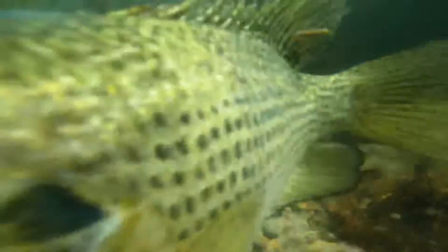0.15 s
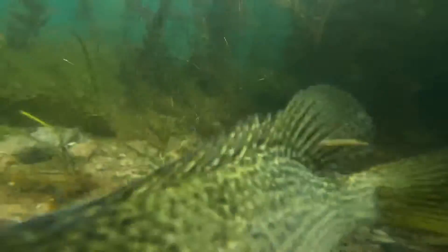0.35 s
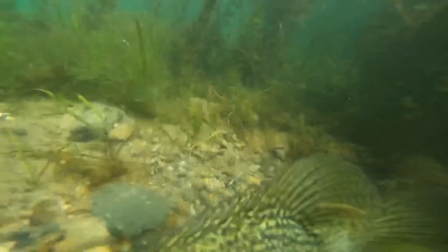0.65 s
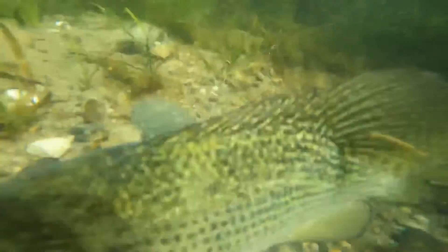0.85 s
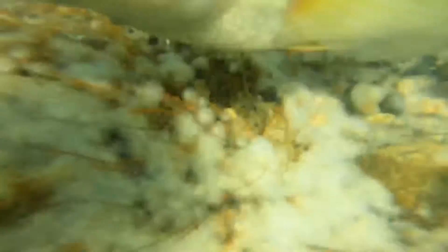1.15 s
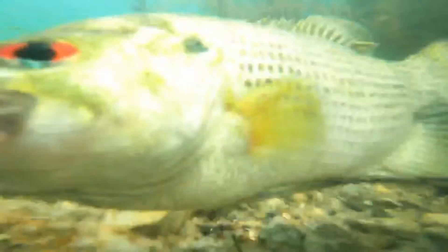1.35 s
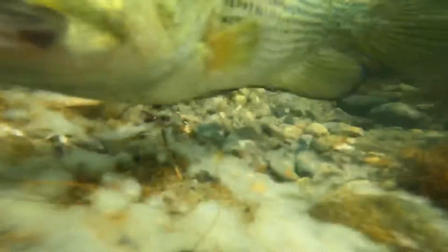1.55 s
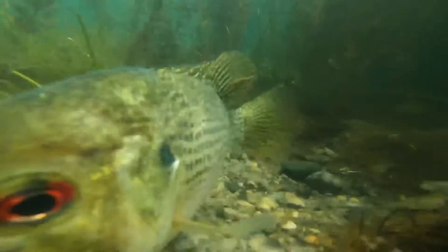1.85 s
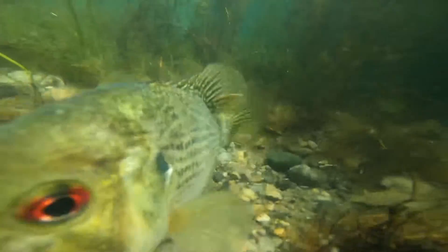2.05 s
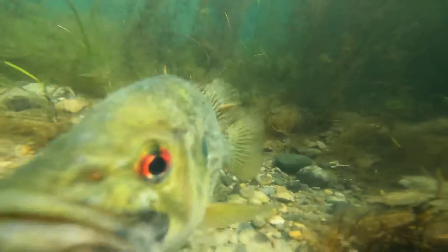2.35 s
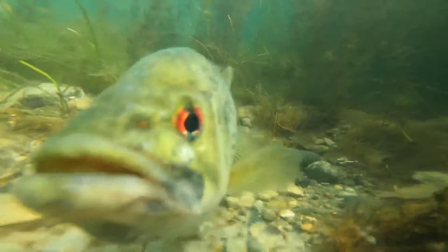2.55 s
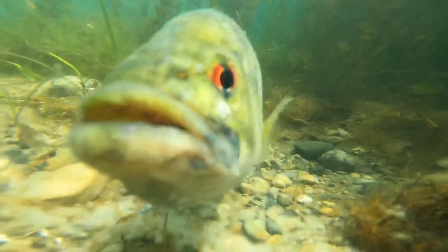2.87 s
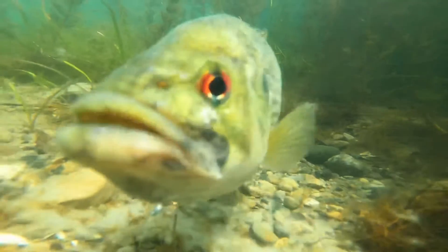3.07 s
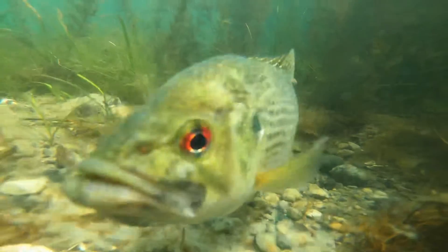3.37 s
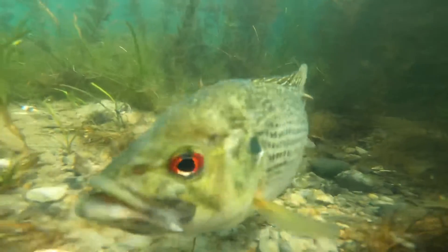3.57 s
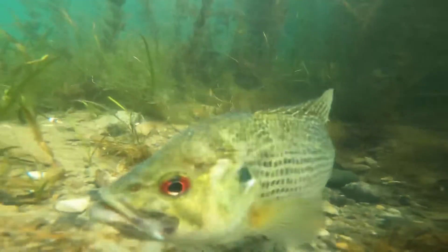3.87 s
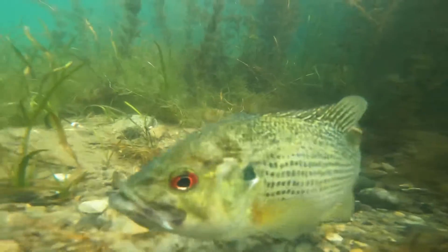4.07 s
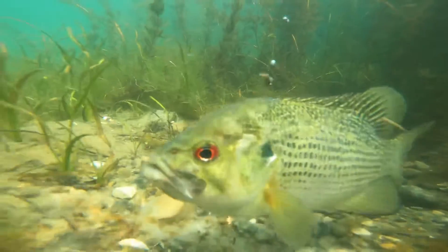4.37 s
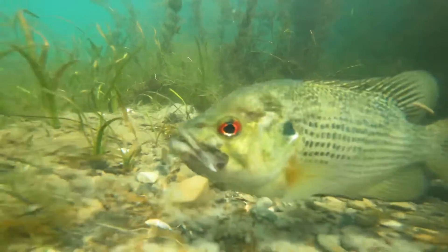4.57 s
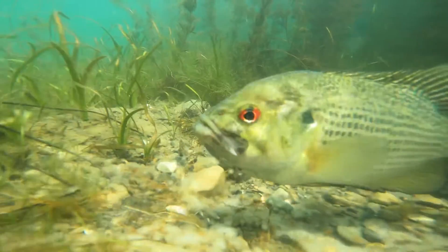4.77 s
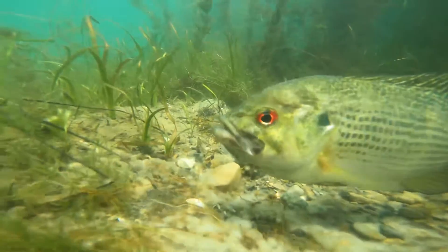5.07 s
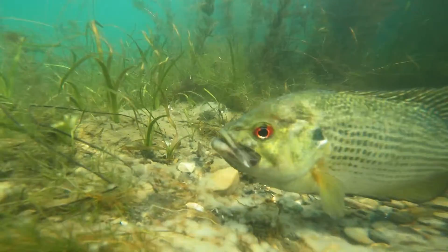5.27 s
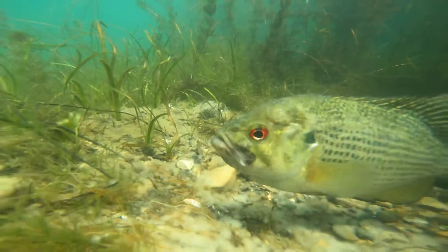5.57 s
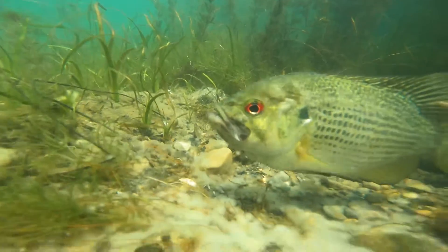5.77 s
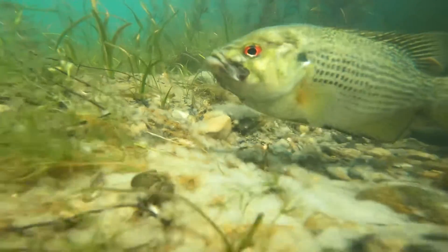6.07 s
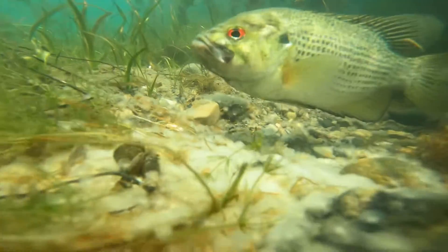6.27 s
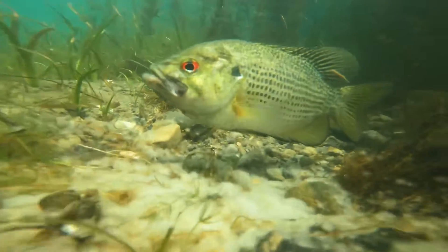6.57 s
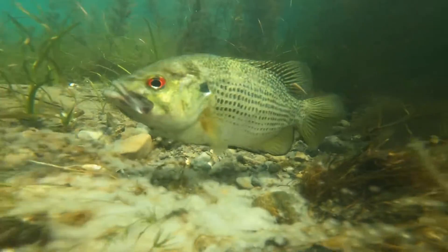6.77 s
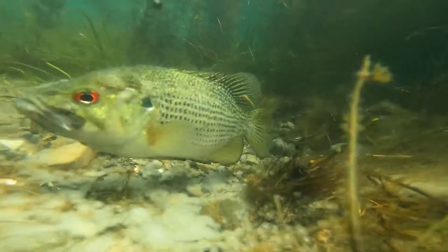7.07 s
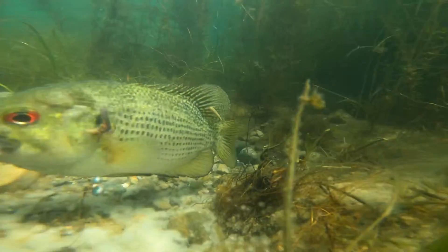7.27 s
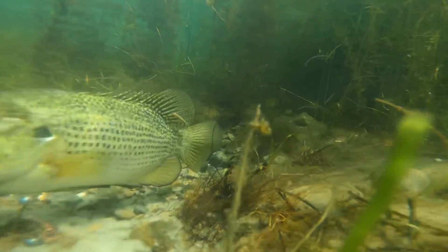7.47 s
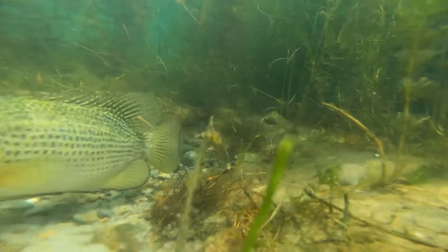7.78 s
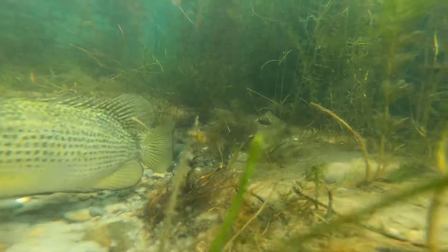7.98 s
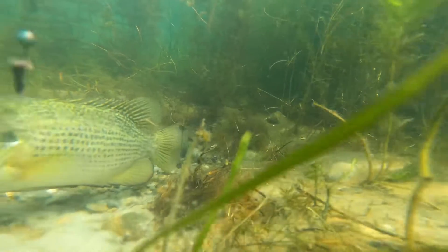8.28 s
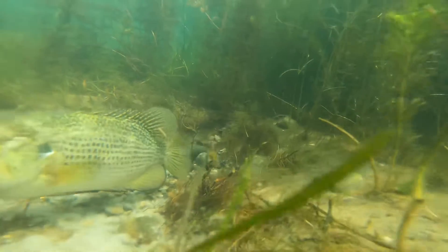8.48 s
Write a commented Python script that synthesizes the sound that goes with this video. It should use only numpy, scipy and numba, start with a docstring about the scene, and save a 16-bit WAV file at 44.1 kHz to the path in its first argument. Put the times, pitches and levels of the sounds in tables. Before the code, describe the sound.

Dry, boxy plastic knocks hit very close to the microphone, with dull low thumps, short rubbing strokes and small gurgling or creaking tones at first. The busy contact fades after two seconds. Muffled underwater quiet remains: thin hiss, faint steady ticking and a weak high whine, soft taps near three and a half seconds, then scraping and a heavy double clunk at six, and almost nothing after.

```python
"""Underwater camera on gravel

A small sealed camera on a stick is moved over a gravel lake bed while a fish brushes past it.
Noise bursts (knocks) and dense random slips (rubbing, and a knock's tail at the start) ring the housing's
modes; after an opening click, water heaves as band-passed low-frequency pushes; shoves and blips are short
sines. Coloured noise hisses, electronics tick and whine; loud contact makes the gain control pull these down."""
import sys
import numpy as np
from scipy import signal
from scipy.fft import rfft, irfft
from scipy.io import wavfile
from scipy.ndimage import uniform_filter1d, minimum_filter1d
from numba import njit

SR = 44100
rng = np.random.default_rng(int(sys.argv[2]) if len(sys.argv) > 2 else 0)


def transcribe(signal):
    """Save signal, clipped to [-1, 1], as a 16-bit WAV file at the path in sys.argv[1]."""
    frames = np.atleast_2d(signal).T
    limited = np.clip(frames, -1, 1)
    pcm = np.round(limited * 32767).astype(np.int16)
    wavfile.write(sys.argv[1], SR, pcm)


N = 380583


def undb(db):
    """Amplitude ratio from dB."""
    return 10 ** (np.asarray(db) / 20)


def level(x, db):
    """Scale x to an RMS level in dB."""
    return x * undb(db) / np.sqrt(np.mean(x ** 2))


def on_log_hz(hz, points, values):
    """Straight lines between points on a log-frequency axis."""
    return np.interp(np.log(hz + 1e-9), np.log(points), values)


def walk(rate_hz):
    """Random drift: levels held 1 / rate_hz seconds, then slewed twice."""
    k = int(SR / rate_hz)
    held = np.repeat(rng.standard_normal(N // k + 1), k)
    return 4.0 * uniform_filter1d(uniform_filter1d(held, k), k)[:N]


def add(out, s, piece):
    """Mix a piece into out at s seconds."""
    i = int(s * SR)
    out[..., i:i + piece.shape[-1]] += piece[..., :N - i]


# housing modes, free ring: (frequency [Hz], t60 [s], level [dB])
HOUSING_MODES = [(158, 0.037, -1), (240, 0.032, 5.5), (266, 0.035, 3), (342, 0.053, -9),
                 (407.4, 0.021, 9.5), (548, 0.023, -15.5), (688, 0.01, 12.5), (1062, 0.012, 1),
                 (1254, 0.022, -8), (1700, 0.012, 4.5), (2155, 0.012, -4.5), (2501, 0.014, -6.5),
                 (2940, 0.0081, -6.5), (3457, .005, -3.5), (4178, 0.0041, 4.5), (4872, 0.005, 1.5),
                 (5520, 0.0053, -3), (6920, 0.0043, -10.5), (9000, 0.0068, -39), (11100, 0.0012, -39)]
# centres of the deep, low, hollow, body, treble and top bands: (frequency [Hz])
BAND_HZ = [220, 420, 800, 2100, 5000, 9000]
LOW_MODE_TOP_HZ = 600


def ring(band_db, swing, damping=1, stretch=(1, 1)):
    """The housing's answer to one tap; each mode builds up over a few cycles, so the lows come late."""
    t = np.arange(4096) / SR
    hz, t60, db = np.array(HOUSING_MODES).T[:, :, None]
    gain = swing * undb(db + on_log_hz(hz, BAND_HZ, band_db))
    hz = hz * np.where(hz < LOW_MODE_TOP_HZ, *stretch)
    build_up = (1 - np.exp(-t * hz / 1.53)) ** 2
    decay = undb(-60 * damping * t / t60)
    return np.sum(gain * np.sin(2 * np.pi * hz * t) * build_up * decay, axis=0)


# rubbing strokes; the first row is the tail of a knock already under way at the start:
# (start [s], rise [s], fall [s], level [dB], body re level [dB], treble re level [dB])
RUB_STROKES = [(0, 0.0014, 0.015, -39.5, 0.5, -48), (0.038, 0.072, 0.18, -37, -17.5, -49),
               (0.165, 0.017, 0.041, -46, -2.5, -41), (0.221, 0.048, .04, -52.5, -42.5, -40),
               (0.341, 0.027, 0.078, -43, -7.5, -30), (.432, 0.0051, 0.037, -46.5, 10, -25),
               (0.44, 0.014, 0.15, -52.5, -17, -29), (0.531, 0.043, 0.25, -47, -5, -21),
               (0.64, 0.05, .06, -51.5, -9, -4), (0.721, 0.065, 0.14, -49, -10.5, -11),
               (0.85, 0.044, 0.17, -46.5, -2, -5), (1.13, 0.12, 0.012, -41, -6, -16),
               (1.241, 0.0053, 0.082, -24, -13.5, -19.5), (1.349, 0.0093, 0.07, -46.5, -17.5, -35),
               (1.41, 0.03, 0.16, -55, 0.5, -6.5), (1.613, 0.012, 0.55, -64, 3, -6),
               (2.762, 0.022, 0.057, -59, -6, -17), (3.372, 0.028, 0.062, -50.5, -1.5, -37),
               (3.465, 0.0184, 0.067, -47.5, -5.5, -26), (3.49, 0.0085, 0.09, -42, -6.5, -24),
               (3.572, 0.024, 0.025, -51, -3, -33), (3.6, 0.0082, 0.1, -40.5, -7, -35),
               (3.686, 0.019, 0.17, -53, -2, -31), (5.07, 0.11, 0.44, -51, -1.5, -11.5),
               (5.6, 0.348, 0.032, -49, 0, -10), (5.96, 0.011, 0.12, -47.5, 3.5, -6.5),
               (6.034, 0.0041, 0.12, -56, 11.5, 7), (6.052, 0.135, 0.0098, -39.5, -1, -8.5),
               (6.18, 0.0064, 0.07, -36.5, -8, -26.5), (6.255, 0.013, 0.067, -57, -2, -9),
               (6.31, 0.0096, 0.36, -61.5, 5, -4.5), (6.598, 0.013, 0.51, -72, 14, 3.5),
               (6.76, 0.03, 0.12, -54.5, 5, -7.5), (8.17, 0.059, 0.26, -59.5, 5, -7)]
RUB_START_DB, RUB_END_DB = -12, -11.5  # re stroke level
RUB_HOLD, RUB_LIFT = 0.06, 0.96  # shares of the fall: held at full level; contact lifting off
RUB_DAMPING = 3.45  # lasting contact: factor on decay rate
SLIPS_PER_S = 4000


def rubbing():
    """Scales, weed and gravel slide as dense uneven slips into the modes; row one is a knock's tail."""
    out, parts = np.zeros(N), []
    for band_db in [(-7, 2.0, -19.5, -61.0, -67.0, -65.0),
                    (-57.5, -56, -8.0, 9.0, -22.0, -30.0),
                    (-73, -67.5, -63.0, -9.5, -5.5, -11.0)]:
        slips = (rng.random(N) < SLIPS_PER_S / SR) * rng.standard_normal(N)
        slips = slips * undb(2.2 * rng.exponential(size=N) + walk(80))
        rung = signal.fftconvolve(slips, ring(band_db, 1, damping=RUB_DAMPING))[:N]
        parts.append(level(rung, 0))
    low, body, treble = parts
    for s, rise, fall, stroke_db, body_db, treble_db in RUB_STROKES:
        a, n = int(s * SR), int((rise + fall) * SR)
        db = stroke_db + np.interp(np.arange(n) / SR, (0, rise, rise + RUB_HOLD * fall, rise + fall),
                                   (RUB_START_DB, 0, 0, RUB_END_DB))
        mix = low[a:a + n] + undb(body_db) * body[a:a + n] + undb(treble_db) * treble[a:a + n]
        lift = np.clip(np.arange(n, 0, -1) / (RUB_LIFT * fall * SR), 0, 1)
        soft_ends = signal.windows.tukey(n, min(200 / n, 1))
        out[a:a + n] += mix * undb(db) * lift * soft_ends
    return out


# water heave; the first point is a click at the very start: (time [s], level [dB])
SURGE_LEVEL = [(0.0, -13), (0.04, -55), (0.65, -51.5), (0.89, -80.5), (1.01, -41), (1.15, -63),
               (1.27, -39.5), (1.58, -67), (2.15, -73), (2.4, -60.5), (3.3, -56), (3.82, -50.5),
               (4.04, -68.5), (5.0, -65.5), (5.53, -53), (6.03, -78), (6.2, -41), (6.34, -70),
               (7.04, -74.5), (7.47, -56), (7.52, -70), (8.63, -67.5)]
SURGE_BAND_HZ, BUMPS_PER_S = (14, 46), 25


def surge():
    """After an opening click, water pressure heaves on the housing in uneven band-passed pushes."""
    bumps = rng.random(N) < BUMPS_PER_S / SR
    pushes = rng.standard_normal(N) * (1 + 45 * bumps)  # short bumps over a steady push
    low = signal.sosfilt(signal.butter(3, SURGE_BAND_HZ, "band", fs=SR, output="sos"), pushes)
    heave = low * undb(walk(20))
    return level(heave, 0) * undb(np.interp(np.arange(N) / SR, *np.transpose(SURGE_LEVEL)))


# hiss colour: (frequency [Hz], relative level [dB per Hz])
HISS_COLOUR = [(76, -35.5), (130, -11), (157, 3.5), (233, -4.5), (393, -6.5), (511, -3), (848, -17.5),
               (1170, -6), (1500, -4.5), (1730, 0), (1950, -7), (2400, -9), (3090, -11), (4500, -6),
               (5430, -15), (6190, -12.5), (7330, -25), (11500, -46.5), (15000, -72), (22000, -120)]
# hiss power common to both ports: (frequency [Hz], share [0-1])
HISS_SHARED = [(60, .95), (130, 1), (640, 0.2), (1400, 1), (3100, 0.4), (4700, 1), (10000, 1), (12000, .3)]
HISS_DB, GRAINS_PER_S = -58, 120


def hiss():
    """Grainy noise, partly shared by the two ports and partly their own: (shared, own pair)."""
    hz = np.fft.rfftfreq(N, 1 / SR)
    colour = undb(on_log_hz(hz, *np.transpose(HISS_COLOUR)))
    share = np.clip(on_log_hz(hz, *np.transpose(HISS_SHARED)), 0, 1)
    white = rng.standard_normal((3, N)) * undb(.55 * walk(60))
    white[0] += 7 * (rng.random(N) < GRAINS_PER_S / SR) * rng.standard_normal(N)
    gain = undb(HISS_DB) / np.sqrt(np.mean(colour ** 2))
    shared = gain * irfft(rfft(white[0]) * colour * np.sqrt(share), N)
    own = gain * irfft(rfft(white[1:]) * colour * np.sqrt(1 - share), N)
    return shared, own


# whine partials: (multiple of frame rate [1], RMS level [dB])
WHINE_PARTIALS = [(199, -76), (200, -78)]
FRAME_S, FRAME_START_S, FRAME_TICK_DB = 1 / 29.97, .0296, -49
CLOCK_S, CLOCK_START_S, CLOCK_TICK_DB = .10245, .066, -44
CLOCK_SLIP_AT_S, CLOCK_SLIP_S = 8.0, .015


def electronics():
    """A faint tick each frame, a stronger one on a slower clock, and a thin whine locked to the frames."""
    t, out = np.arange(N) / SR, np.zeros(N)
    tick = ring((-30.0, -36.5, -13.5, -4.5, -2.5, -11.5), 1)
    tick /= np.abs(tick).max()
    frames = np.arange(FRAME_START_S, N / SR, FRAME_S)
    slow = np.arange(CLOCK_START_S, N / SR - CLOCK_S, CLOCK_S)
    slow += (slow > CLOCK_SLIP_AT_S) * CLOCK_SLIP_S
    for times, db in ((frames, FRAME_TICK_DB), (slow, CLOCK_TICK_DB)):
        for s, c in zip(times, rng.standard_normal(len(times))):
            add(out, s, undb(db + 2 * c) * tick)
    for k, db in WHINE_PARTIALS:
        out += undb(db) * np.sqrt(2) * np.sin(2 * np.pi * k / FRAME_S * t)
    return out


# short tones: (start [s], length [s], start pitch [Hz], end pitch [Hz], level [dB])
BLIP_TONES = [(0.005, 0.048, 756, 777, -55), (0.073, 0.015, 954, 903, -40.5), (.102, 0.03, 480, 512, -29.5),
              (0.105, 0.024, 970, 910, -42), (0.075, 0.021, 320, 313, -36.5),
              (0.127, 0.02, 315, 320.3, -25.5), (0.149, 0.011, 355, 356.6, -26),
              (0.166, 0.019, 1860, 1660, -39), (0.159, 0.028, 966, 773, -41.5),
              (0.185, 0.044, 419, 329.6, -40), (0.283, 0.05, 503, 572, -44.5),
              (.286, 0.037, 333, 326, -39.5), (0.322, 0.022, 335, 340, -43), (0.701, 0.091, 346, 341, -43),
              (0.721, 0.058, 670, 693, -39), (6.774, 0.02, 351, 360, -49), (6.79, 0.024, 475, 457, -47.5),
              (6.844, 0.043, 713, 706, -50), (8.202, 0.021, 213.6, 186, -45)]


def blips():
    """Short tones that swell, glide and stop, as trapped air gurgles or the mount creaks."""
    out = np.zeros(N)
    for s, length, start_hz, end_hz, db in BLIP_TONES:
        n = int(length * SR)
        phase = 2 * np.pi * np.cumsum(np.linspace(start_hz, end_hz, n)) / SR
        swell = np.sin(np.pi * np.linspace(0, 1, n) ** 1.5)
        add(out, s, undb(db) * swell * np.sin(phase))
    return out


# blows: (time [s], level [dB], spot, tilt [dB per octave], extra lows [dB], contact [ms],
# left minus right [dB])
KNOCK_BLOWS = [(0.382, -29.5, "mount", 3.5, -10.5, 1.2, 1.5), (0.43, -6.5, "shell", 8, 8.5, 0.1, -1),
               (0.7, -24.5, "base", 2, -7.5, 2.2, -3.5), (0.7755, -27.5, "grit", 0, 5.5, 1.1, 3),
               (0.8017, -31, "base", -3.5, 9.5, 2.5, -3), (0.8334, -26, "shell", -4, 3, 1.4, 0),
               (0.872, -30.5, "hollow", -2, 7.5, 1.3, 0), (0.8838, -15, "hollow", 3.5, 9, 2.75, -5),
               (0.8971, -32, "hollow", -4, 10.5, 3.5, 16), (0.907, -28, "hollow", 0, 5, 4.8, 15),
               (0.9176, -10.5, "hollow", 1, -11, 1.6, -2), (0.937, -27.5, "hollow", -5.5, 6, 1.6, 7),
               (0.9542, -23, "hollow", 3.5, 19, 2.4, 0), (0.963, -29, "base", 7, 6.5, 4, -3),
               (0.9801, -4, "hollow", 1.7, -3.5, 2.9, 2.5), (0.9959, -4, "hollow", 5.5, 11, 1.5, 2),
               (1.0686, -31.5, "mount", -4, -7.5, 0.95, -1), (1.221, -32.5, "base", 1, 0.5, 2, 0),
               (1.2363, -9, "base", 1.8, -4, 0.93, -3), (1.2689, -16, "base", -4.5, 4, 0.92, -5.5),
               (1.277, 0, "shell", -4, -2, 0.41, -5), (1.2817, -4.5, "shell", 4, -1.5, 1.16, 3.5),
               (1.3313, -4.5, "shell", 7.5, 6.5, 2, 0), (1.3418, -6.5, "shell", 2, 9.5, 1.6, 0.5),
               (1.4064, -29.5, "base", 6, 3.5, 1.9, 0.5), (1.6, -21, "face", 0.5, 0.5, 4.4, -2.5),
               (1.814, -39.5, "mount", -2.1, -3, 1.4, -4), (1.979, -35.5, "face", -2.5, 4.5, 3.5, -1),
               (2.1071, -16, "face", 3.5, 2.5, 2.2, -2.5), (2.786, -51, "mount", 0.5, 2.5, 2.4, -2.5),
               (3.377, -41.5, "mount", -5, 1, 2.9, -4), (3.5094, -38, "shell", -2, 10, 1.1, -13),
               (3.5972, -33.5, "shell", 9, 8, 0.92, -2), (3.7807, -34.5, "grit", 3.5, 8, 1.9, 0),
               (3.7893, -35.5, "mount", 4, 1.5, 4.4, 5), (5.375, -40, "grit", -2.5, -12, 1.4, 3.5),
               (5.5282, -36, "mount", 4, 8, 1.5, 0), (5.9277, -10, "face", 2.85, 4.5, 0.55, -1.5),
               (6.036, -44, "grit", 5, -7, 2, 10), (6.0943, -31.5, "grit", 1.5, 4, 2.8, 5),
               (6.16, -9.5, "whole", 2, -2, 5.1, 1), (6.164, -0.5, "whole", -1, -2.5, 1.3, -2),
               (6.169, -2, "whole", -1, 3, 1.5, 5.5), (6.176, -29.5, "grit", 1, -20, 0.86, 8),
               (6.219, -48, "base", -2, 5, 1.5, 4), (6.2586, -46, "shell", -8, -3.5, 1.4, -4),
               (6.601, -41.5, "base", 1, -5.5, 2.44, -1), (6.872, -42.5, "grit", 1, -3, 0.9, 1),
               (6.994, -45.5, "base", -2, -16, 1.2, 7.5), (7.26, -42, "shell", -10.5, -21, 0.9, 3.5),
               (7.4483, -33.5, "mount", 5.5, 7.5, 0.89, 1.5)]
# answer where struck, spot: (deep [dB], low [dB], hollow [dB], body [dB], treble [dB], top [dB], thump [dB])
SPOT_ANSWERS = {"shell": (-29.5, -20, -20.5, 1, -23.5, -28.5, -42.5),
                "hollow": (-31.5, -14, -1, -7, -20, -7, -40), "base": (-26, 9, -7.5, -6, -20, -16.5, -26.5),
                "mount": (-7, -13.5, -15.5, -18.5, -6.5, -10.5, -7.5),
                "face": (-52, -9, -17.5, -4.5, -24, -18, -41.5), "grit": (-28, -9.5, -16, -19, -3, -6, -28),
                "whole": (-20.5, 0.5, -1, -9, -4.5, 0.5, -28.5)}
# loaded housing, spot: (low-mode pitch factor [1], high-mode pitch factor [1])
SPOT_PITCH = {"face": (1.05, 1), "whole": (.9, .85)}
# gripped housing, spot: decay rate factor [1]
SPOT_DAMPING = {"whole": 1.7}
THUMP_HZ, THUMP_T60_S = 45, 0.0072
RATTLE_DB, RATTLE_T60_S = -29, 0.031


def knocks():
    """A blow, its chatter and a faint rattle ring the modes; the push on the whole housing thumps."""
    out, t = np.zeros((2, N)), np.arange(4096) / SR
    chance = rng.standard_normal((len(KNOCK_BLOWS), len(t) + len(HOUSING_MODES)))
    thump = np.sin(2 * np.pi * THUMP_HZ * t) * undb(-60 * t / THUMP_T60_S)
    octaves = np.append(np.log2(np.array(BAND_HZ) / 1000), 0)  # the thump does not tilt
    lows = np.append(np.array(BAND_HZ) < LOW_MODE_TOP_HZ, 0)
    for (s, knock_db, spot, tilt_db, low_db, contact_ms, pan_db), c in zip(KNOCK_BLOWS, chance):
        *band_db, thump_db = SPOT_ANSWERS[spot] + tilt_db * octaves + low_db * lows
        chatter = 0.14 * np.exp(-(t / (contact_ms / 1000)) ** 2)
        rattle = undb(RATTLE_DB - 60 * t / RATTLE_T60_S)
        blow = c[:len(t)] * (chatter + rattle)
        blow[:12] += np.hanning(12) / 3  # the first touch
        swing = undb(1.8 * c[len(t):, None])  # each blow lands a little apart
        answer = ring(band_db, swing, damping=SPOT_DAMPING.get(spot, 1), stretch=SPOT_PITCH.get(spot, (1, 1)))
        knock = signal.fftconvolve(blow, answer)[:len(t)]
        side = undb(np.array([[pan_db], [-pan_db]]) / 2)
        add(out, s, undb(knock_db) * (side * knock / np.abs(knock).max() + undb(thump_db) * thump))
    return out


# shoves of water or stick on the whole housing: (time [s], level [dB])
HOUSING_SHOVES = [(0.382, -37.5), (1.01, -39.5), (1.275, -27.5), (2.25, -61.5), (2.79, -45), (2.958, -47),
                  (3.381, -50), (3.532, -42), (3.791, -34), (5.372, -53.5), (5.532, -47.5), (5.966, -51.5),
                  (6.168, -32.5), (7.448, -47)]
SHOVE_HZ, SHOVE_T60_S = 42, .07


def shoves():
    """Each shove is one heavily damped swing of the housing."""
    out, t = np.zeros(N), np.arange(4096) / SR
    swing = np.sin(2 * np.pi * SHOVE_HZ * t) * undb(-60 * t / SHOVE_T60_S)
    for s, shove_db in HOUSING_SHOVES:
        add(out, s, undb(shove_db) * swing / swing.max())
    return out


@njit
def duck(over_db, depth, deepest_db, quick_db_per_s, build_per_s, slow_db_per_s):
    """Gain loss in dB: a deep part that lets go quickly and a part that piles up and drains slowly."""
    loss, deep, piled = np.empty(len(over_db)), 0., 0.
    for i in range(len(over_db)):
        deep = max(deep - quick_db_per_s / SR, min(depth * over_db[i], deepest_db))
        piled = max(piled + (build_per_s * over_db[i] - slow_db_per_s) / SR, 0.)
        loss[i] = deep + piled
    return loss


def gain_control(contact):
    """Gain on the steady sounds, pulled down while contact peaks exceed the threshold, then recovering."""
    peak = -minimum_filter1d(-np.abs(contact.mean(axis=0)), size=131)
    over_db = np.maximum(20 * np.log10(peak + 1e-9) + 10, 0)  # threshold -10 dB
    loss_db = duck(over_db, 2.9, 22.0, 150.0, 80.0, 4.57)
    return undb(-uniform_filter1d(loss_db, size=441))


# the two microphone ports: (frequency [Hz], left minus right [dB], left lead [rad])
PORT_RESPONSE = [(60, -1.5, 0.16), (201, 6, 0.32), (375, -5, 0.53), (871, 5, 1.5), (1330, -1.5, 0.62),
                 (2060, -5, 0.82), (2740, -5, 0.36), (4180, 0, 1.6), (4400, 2.5, 0), (8000, -1.5, 0.4),
                 (13000, -5.5, 0.43)]


def ports(x):
    """Each port hears the housing with its own level and lead."""
    hz = np.fft.rfftfreq(N, 1 / SR)
    points, db, lead = np.transpose(PORT_RESPONSE)
    half = undb(on_log_hz(hz, points, db) / 2) * np.exp(.5j * on_log_hz(hz, points, lead))
    return irfft(rfft(x) * np.array([half, 1 / half]), N)


def scene():
    """Contact, water and ducked steady sounds reach both ports; each port adds its own ducked hiss."""
    contact = knocks() + rubbing() + blips()
    gain = gain_control(contact)
    shared, own = hiss()
    steady = gain * (shared + electronics())
    return ports(contact + surge() + shoves() + steady) + gain * own


TOP_HZ = 16000


def record(dry):
    """The recorder rounds the loudest peaks and cuts the top."""
    rounded = np.tanh(0.82 * dry) / 0.83
    return signal.sosfilt(signal.ellip(8, .2, 70, TOP_HZ, fs=SR, output="sos"), rounded)


dry = scene()
out = record(dry)
transcribe(out)
```